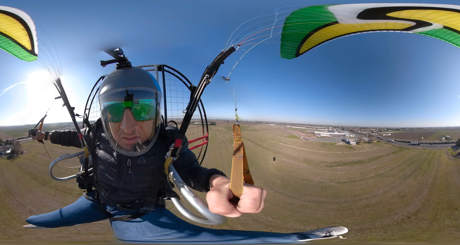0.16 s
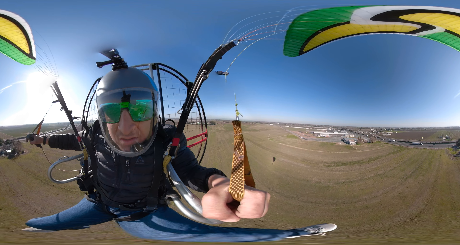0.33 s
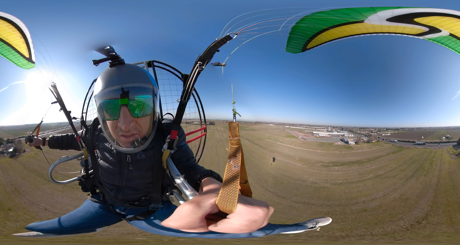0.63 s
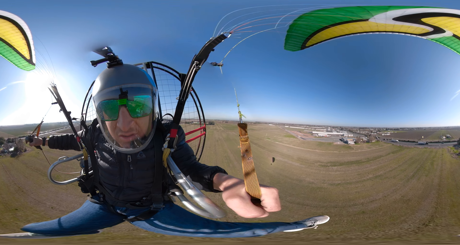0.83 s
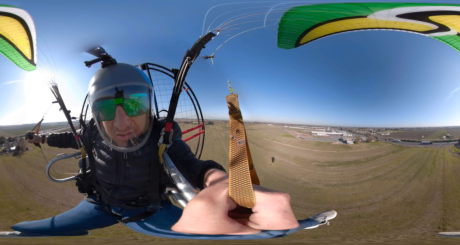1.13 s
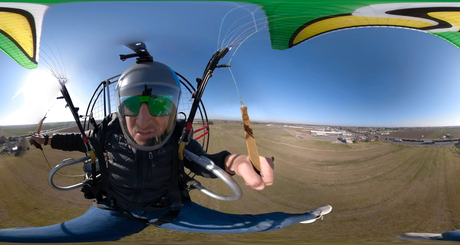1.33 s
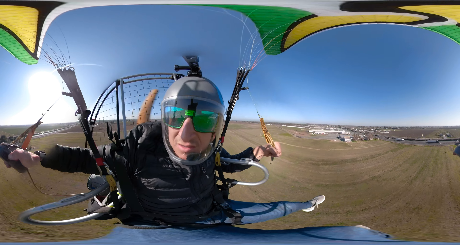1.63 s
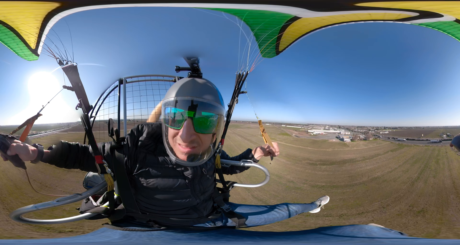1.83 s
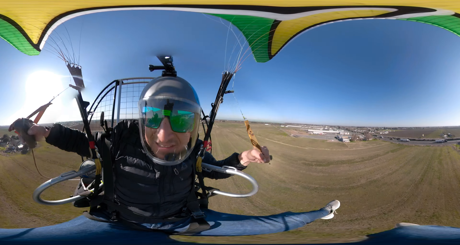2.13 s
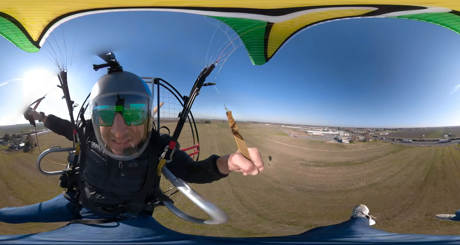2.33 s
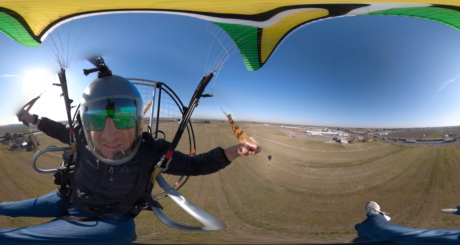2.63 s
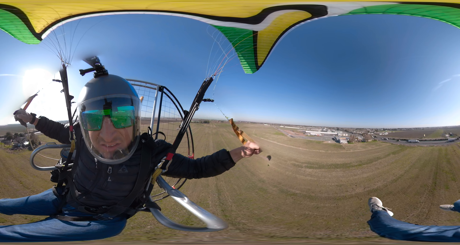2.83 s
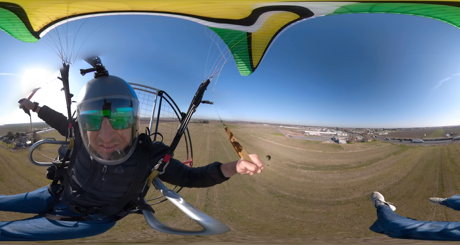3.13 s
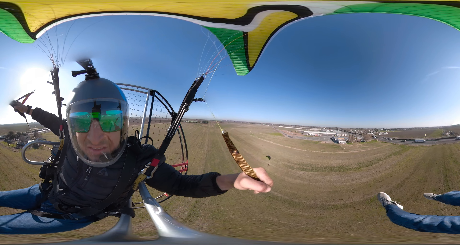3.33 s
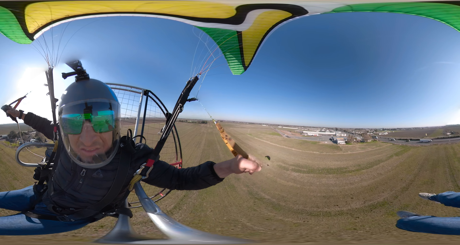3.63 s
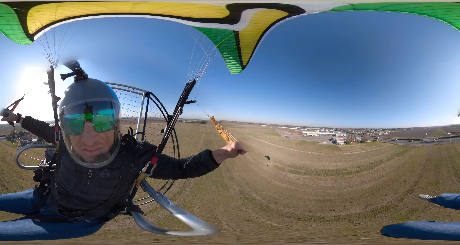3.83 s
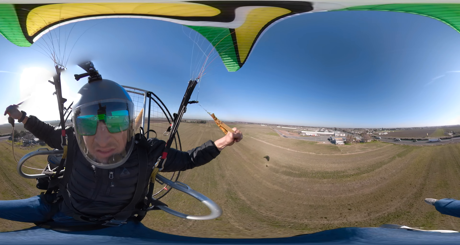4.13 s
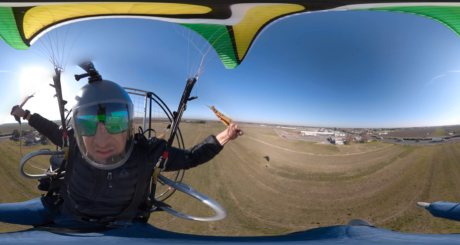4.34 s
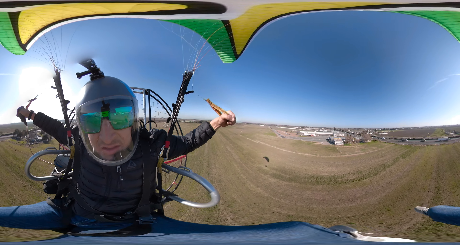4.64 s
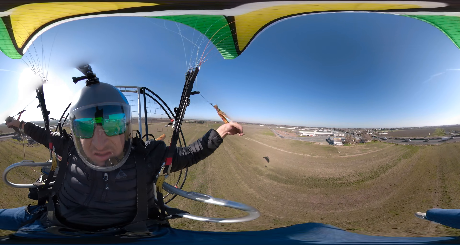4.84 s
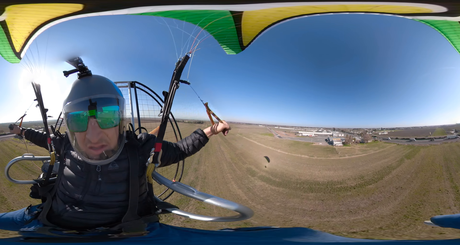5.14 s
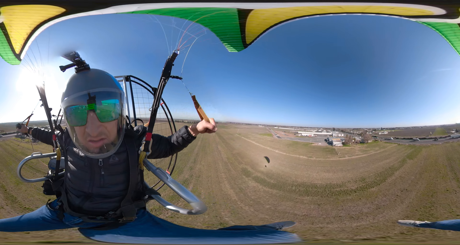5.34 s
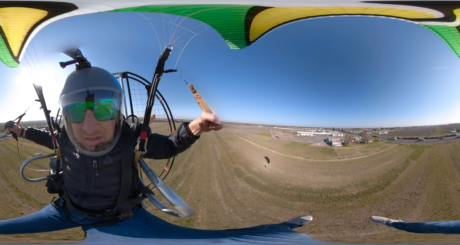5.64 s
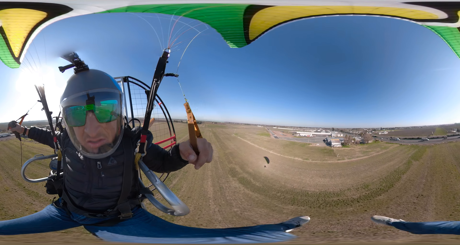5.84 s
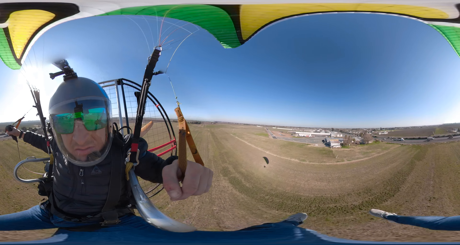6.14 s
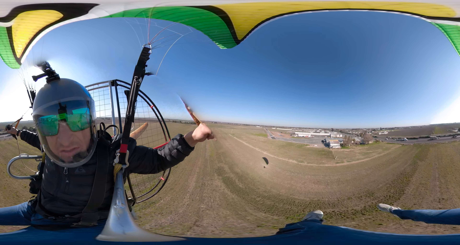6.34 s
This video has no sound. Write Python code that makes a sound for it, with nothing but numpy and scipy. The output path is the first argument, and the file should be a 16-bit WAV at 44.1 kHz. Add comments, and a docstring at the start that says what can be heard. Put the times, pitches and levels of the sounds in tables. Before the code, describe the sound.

A paramotor engine idles in flight, then shuts off and putters to a squeaky stop, leaving wind buffeting the microphone.

```python
"""A paramotor's single-cylinder engine idles and turns its propeller just behind the pilot, in open air.
Each crank turn puffs into the exhaust pipe's modes, firings bark, and the passing blades add a hum.
The engine is switched off, runs down in separate puffs and stops with a belt squeak and a jolt.
The freewheeling propeller keeps the clutch drum ringing and ticking by friction for a while,
and turbulent wind buffets the microphone."""
import sys
import numpy as np
from scipy import signal
from scipy.fft import rfft, irfft
from scipy.io import wavfile
from scipy.ndimage import uniform_filter1d

SR = 44100
rng = np.random.default_rng(int(sys.argv[2]) if len(sys.argv) > 2 else 0)


def waveform_to_disk(signal):
    """Save audio, clipped to [-1, 1], as 16-bit WAV at the path in sys.argv[1]."""
    frames = np.transpose(np.atleast_2d(signal))
    scaled = np.clip(frames, -1, 1) * 32767
    samples = np.round(scaled).astype(np.int16)
    wavfile.write(sys.argv[1], SR, samples)


N = 285768
TIME = np.arange(N) / SR

# turning rate of the crankshaft, one exhaust puff per turn: time_s, speed_hz
CRANK_RATE = [(0.0, 46.61), (0.3, 47.7), (0.6, 46.9), (0.9, 46.68), (1.2, 46.6), (1.8, 47.46), (2.1, 47.52),
              (2.35, 46.42), (2.55, 47.0), (2.7, 39.5), (2.85, 35.2), (3.0, 29.9), (3.2, 24.4), (3.6, 13.6),
              (3.8, 7.28)]
# spectrum of the engine's rasp: frequency_hz, density_db
RASP_SPECTRUM = [(180, -12), (300, -4.5), (471, -5.5), (504, -9), (619, -8), (691, -17.5), (803, -15.5),
                 (1230, -21), (1570, -19.5), (2240, -33), (3110, -35), (3470, -32.5), (4250, -43),
                 (5590, -31), (7870, -41.5), (10200, -60.5), (17300, -120)]
# spectrum of rubbing metal: frequency_hz, density_db
FRICTION_SPECTRUM = [(1500, -16.5), (2700, -5), (3500, -3.5), (4300, -12), (5000, 1.5), (5700, 1),
                     (6500, -9), (7600, 0.5), (8700, -21), (11000, -16), (15000, -35)]

IDLE_SPEED_HZ = 47
SWITCH_OFF_S, DYING_AWAY_S, STOP_S = 2.54, 0.3, 3.8


def engine():
    """Periodic excitation: each crank turn sends a puff down the exhaust; slow puffs are heard apart."""
    # strength and treble tilt of the puffs: time_s, level_db, tilt_db_per_octave
    puff_curve = [(0, -43, -15), (2.35, -22.5, -3), (2.58, -19.5, 0), (2.85, -18, 4.5), (3.08, -13.5, -4.5),
                  (3.3, -15, 1.5), (3.55, -16.5, -6), (3.8, -18.5, -5.5)]
    speed, turns = crankshaft()
    dying = np.clip((TIME - SWITCH_OFF_S) / DYING_AWAY_S, 0, 1)
    turn_starts = np.flatnonzero(np.diff(np.floor(turns)))
    puff_db, tilt_db = in_time(puff_curve)
    puffs = exhaust(TIME[turn_starts] - .0008, puff_db[turn_starts], tilt_db[turn_starts])
    running = hum(speed, turns, dying) + rasp(speed, turns, dying)
    return puffs + running + piston_knocks(turn_starts) + air_pumping(speed, turns)


def crankshaft():
    """Phase is the integral of frequency: speed in Hz and turns made, at every sample."""
    speed = in_time(CRANK_RATE)[0] * (TIME < STOP_S) + 1e-3
    return speed, .34 + np.cumsum(speed) / SR


def exhaust(times, level_db, tilt_db):
    """Modal superposition: puffs ring the pipe, and the lowest mode, in antiphase, rounds each one."""
    # modes of exhaust and frame: pitch_hz, level_db, t60_s
    pipe_modes = [(78, -1, 0.081), (127.3, -1, 0.12), (164.5, -6, 0.18), (240, -5.5, 0.13),
                  (405, -14, 0.085)]
    pivot_hz = pipe_modes[1][0]
    modes = []
    for hz, db, t60 in pipe_modes:
        mode_db = level_db + db + tilt_db * np.log2(hz / pivot_hz)
        modes.append(strike(times, mode_db, hz, t60, spread_db=1))
    return sum(modes[1:]) - modes[0]


def barks():
    """Impulse excitation: each firing slaps the air, rings the pipe, crackles and rattles metal."""
    # runs in which the engine barks every second turn: start_s, bark_count, level_db, rattle_change_db
    bark_runs = [(0.162, 1, -16, 3), (0.2050, 2, -12, -5), (0.3106, 2, -11, -11), (.4163, 6, -11.5, 2.5),
                 (0.6917, 2, -12.5, -4), (.7993, 2, -12.5, 1.5), (0.9072, 4, -12, -3), (1.0991, 2, -11, 2),
                 (1.1838, 1, -14, -5), (1.248, 4, -13, -2), (1.4200, 2, -20.5, -3), (1.5267, 2, -18.5, 12),
                 (1.632, 2, -16, -1), (1.7160, 3, -19.5, -5), (1.8640, 3, -14.5, 0), (2.0110, 1, -13, 5),
                 (2.053, 1, -20, -1), (2.096, 2, -14.5, -1), (2.203, 1, -17.5, 0), (2.2450, 1, -10.5, -3),
                 (2.3098, 1, -14, -1), (2.3519, 2, -12.5, 3), (2.437, 1, -17, -3), (2.4584, 1, -19.5, -1),
                 (2.5222, 1, -17, 3)]
    # pipe modes that a bark excites: pitch_hz, level_db, t60_s
    bark_modes = [(395, -2.5, 0.028), (540, -10.5, 0.018), (806, -9, 0.025), (1080, -17, 0.013),
                  (1500, -11.5, 0.017), (1840, -21.5, 0.019)]
    # modes of the rattling parts: pitch_hz, level_db, t60_s
    rattle_modes = [(3380, -40, 0.02), (3520, -27, 0.028), (3760, -33, 0.016), (5340, -30, 0.016),
                    (5800, -28, 0.024), (6920, -28, 0.022)]
    events = [(start + 2 * k / np.interp(start, *np.transpose(CRANK_RATE)), db, change)
              for start, count, db, change in bark_runs for k in range(round(count))]
    times, level_db, rattle_db = np.transpose(events)
    level_db = level_db - rng.standard_normal(len(times))
    pipe = -sum(strike(times + 0.000974, level_db + db, hz, t60, spread_db=1.2)
                for hz, db, t60 in bark_modes)
    edge = bursts(clicks_at(times + 0.00028, from_db(level_db - 0.5)), rise_s=0.0012, fall_s=0.0036)
    crackle = edge * butterworth(noise(RASP_SPECTRUM), 1, 900, "high")
    rattle = np.zeros(N)
    for hz, db, t60 in rattle_modes:
        delays = rng.uniform(0.0013, 0.0055, len(times))
        rattle += strike(times + delays, level_db + rattle_db + db, hz, t60, spread_db=3.5)
    puffs = exhaust(times - .001, level_db - 9.5, tilt_db=0)
    return puffs + pressure_slap(times + 0.00098, level_db + 2.5) + pipe + crackle + rattle


def pressure_slap(times, level_db):
    """A bark's pressure wave is a short compression followed by a longer, weaker rarefaction."""
    push_s, suction_s = .0015, 0.00325
    push, suction = (np.hanning(int(length * SR)) ** .3 for length in (push_s, suction_s))
    pulse = np.concatenate([push, -from_db(-3.5) * suction])
    slaps = np.convolve(clicks_at(times - push_s, from_db(level_db)), pulse)[:N]
    return butterworth(slaps + 1e-18, 2, 1660, "low")


def hum(speed, turns, dying):
    """Rotation makes harmonic series: the geared-down propeller hums out of step with the engine."""
    # harmonics of the blade-passing hum: order, level_db
    blade_orders = [(1, -8.5), (3, -7), (4, -6), (5, -10), (6, -9), (7, -6), (8, -15.5), (9, -16.5),
                    (10, -18.5), (14, -17)]
    # harmonics of the crank's turning rate: order, level_db
    engine_orders = [(1, -5), (5, -16.5), (6, -13.5), (7, -11.5), (9, -16), (10, -12.5), (12, -21),
                     (17, -22)]
    blade_passes_per_turn, throb_depth = .6405, 0.94
    blade_passes = blade_passes_per_turn * turns + .006 * drift(10)
    throb = 1 + throb_depth * np.cos(2 * np.pi * turns)
    blades = tones(blade_passes, blade_orders, waver_db=1.5) * throb
    blades *= (speed / IDLE_SPEED_HZ) ** 0.86
    drone = tones(turns, engine_orders, waver_db=0.5) * from_db(-9 * dying)
    return from_db(-18.5) * (blades + drone) * fade_below(speed, corner_hz=34)


def rasp(speed, turns, dying):
    """Amplitude modulation: noise throbs with each crank turn and weakens after the switch-off."""
    crank = 2 * np.pi * (turns - .12)
    throb_db = 5.14 * np.cos(crank) + 1.2 * np.cos(2 * crank)
    level_db = -29 - 7.5 * dying + throb_db + 2.8 * drift(100)
    return from_db(level_db) * (speed / IDLE_SPEED_HZ) ** 1.14 * noise(RASP_SPECTRUM)


def piston_knocks(turn_starts):
    """Impacts of the piston excite the cylinder's modes, most strongly as the engine runs down."""
    # strength of the knocks: time_s, level_db
    knock_curve = [(0, -73), (2.6, -51), (3.0, -32), (3.3, -26.5), (3.5, -31), (3.8, -33)]
    # modes of the cylinder: pitch_hz, level_db, t60_s
    cylinder_modes = [(1500, -12, 0.028), (1770, -8, .03), (1970, -6, 0.027), (2220, -13.5, .025)]
    times = TIME[turn_starts] + 0.00183
    knock_db = in_time(knock_curve)[0][turn_starts]
    return sum(strike(times + rng.uniform(0, .001, len(times)), knock_db + db, hz, t60)
               for hz, db, t60 in cylinder_modes)


def air_pumping(speed, turns):
    """Periodic displacement: with the engine off, the piston pumps air in tones that fall with speed."""
    # harmonics of the crank's turning rate: order, level_db
    pumping_orders = [(2, -22.5), (3, -26), (4, -25.5), (5, -29), (6, -26), (7, -27), (8, -33)]
    onset_s = 0.03
    coasting = np.clip((TIME - SWITCH_OFF_S) / onset_s, 0, 1) * fade_below(speed, corner_hz=30)
    uneven_turns = turns + .014 * drift(25)
    return coasting * tones(uneven_turns, pumping_orders, waver_db=1.5) * from_db(1.5 * drift(50))


def stall():
    """Recoil: the last compression throws the piston back, so the belt scuffs and the frame jolts."""
    # modes of the jolted frame: pitch_hz, level_db, t60_s
    jolt_modes = [(156, -8.5, 0.14), (193, -8.5, 0.056), (244, -8.5, 0.041), (438, -18.5, 0.052),
                  (527, -18, 0.042), (1490, -20.5, 0.06)]
    # resonances of the scuffed pulley: pitch_hz, bandwidth_hz, level_db
    pulley_modes = [(3770, 260, -31), (5750, 480, -26)]
    scuff_s, jolt_s = 3.8265, 3.8392
    scuff = bursts(clicks_at([scuff_s], [1]), rise_s=0.0027, fall_s=.004) * sing(pulley_modes)
    jolt = sum(strike([jolt_s], db, hz, t60) for hz, db, t60 in jolt_modes)
    return scuff + butterworth(jolt, 2, [90, 1100], "band")  # rubber mounts soften the blow


def belt_squeak():
    """Stick-slip friction: the belt squeaks as the engine stops, the fundamental ahead of its octave."""
    # slips of the belt, hardest first: start_s, length_s, fundamental_db, octave_db
    slips = [(3.826, 0.025, -24.5, -20.5), (3.865, 0.03, -37, -46.5), (3.98, 0.033, -56, -56)]
    pitch_hz, bend_hz, lift_hz = 3330, 382, 172
    attack_s, octave_attack_s, settle_s, release_s, tail_s = 0.0013, 0.014, 0.0032, 0.0043, 0.05
    hardest_db = slips[0][2]
    squeak = np.zeros(N)
    for start, length, fundamental_db, octave_db in slips:
        age = np.maximum(TIME - start, 0)
        since_release = np.maximum(age - length, 0)
        grip = np.exp(-np.minimum(since_release / release_s, 30))
        # a hard slip starts sharp, settles, and rises again as it lets go
        bend = from_db(fundamental_db - hardest_db) * np.exp(-age / settle_s)
        hz = pitch_hz + bend_hz * bend + lift_hz * (1 - grip)
        phase = 2 * np.pi * np.cumsum(hz * (1 + .008 * drift(250))) / SR
        phase += 0.051 * drift(810)  # fast jitter roughens the tone
        fundamental = from_db(fundamental_db) * np.minimum(age / attack_s, 1)
        octave = from_db(octave_db) * np.minimum(age / octave_attack_s, 1)
        partials = [fundamental, octave, from_db(-21) * fundamental, from_db(-33) * octave]
        tone = np.sqrt(2) * sum(size * np.sin(k * phase) for k, size in enumerate(partials, 1))
        friction = from_db(-20) * fundamental * noise(FRICTION_SPECTRUM)
        tail = from_db(-27) * np.exp(-since_release / tail_s)  # the pulley rings on
        squeak += np.maximum(grip, tail) * (tone + friction)
    return squeak * from_db(1.14 * drift(400))


def clutch():
    """Friction drives resonance: the shoes hiss on the drum, which rings near 7 kHz."""
    # strength of the drum's ringing: time_s, level_db
    drum_curve = [(0, -48), (.25, -49), (.45, -73), (2.6, -66.5), (3.75, -49.5), (4.12, -52), (4.26, -62),
                  (4.55, -64), (4.64, -57), (5.17, -59), (5.55, -77), (6.15, -102)]
    # strength of the rubbing hiss: time_s, level_db
    rub_curve = [(0, -51), (2.58, -48.5), (2.8, -56), (3.6, -53.5), (4.1, -61.5), (4.5, -62.5), (5.03, -54),
                 (5.2, -64), (5.5, -78), (6.15, -106)]
    # scrapes that make the drum flare: centre_s, half_width_s, level_db
    scrapes = [(3.594, 0.0046, -57), (3.703, 0.016, -44), (3.778, 0.0074, -46), (3.967, 0.0053, -44),
               (4.01, .009, -47.5), (4.643, 0.013, -54), (4.998, 0.016, -54), (5.1, 0.013, -46.5),
               (5.194, 0.021, -57)]
    # resonances of the drum: pitch_hz, bandwidth_hz, level_db
    drum_modes = [(7077, 52, 4), (7200, 28, 6.5), (7600, 270, -8)]
    rub_db, = in_time(rub_curve)
    ringing = from_db(in_time(drum_curve)[0] + 3.2 * drift(26))
    flares = sum(from_db(db) * swell(centre, half) for centre, half, db in scrapes)
    drum = (ringing + flares * from_db(2.5 * drift(250))) * rms_one(sing(drum_modes))
    hiss = from_db(rub_db + 2.3 * drift(25)) * noise(FRICTION_SPECTRUM)
    return drum + hiss + shoe_ticks(rub_db)


def shoe_ticks(rub_db):
    """Brief contacts make broadband ticks: the shoes catch now and then, and once a turn at low speed."""
    # distinct catches of the shoes: start_s, level_db
    catches = [(2.938, -32), (3.5572, -29), (3.8734, -29), (3.974, -35), (4.017, -31), (4.697, -31),
               (4.829, -39), (4.854, -29.5), (4.866, -37), (4.893, -33), (4.918, -36), (5.0508, -25),
               (5.1147, -27), (5.168, -25.5), (5.373, -35.5), (5.432, -49)]
    # spectrum of a tick: frequency_hz, density_db
    tick_spectrum = [(1200, -9), (2700, 1), (4200, -6.5), (5700, 4), (6800, 0), (8500, -16.5),
                     (12000, -21.5), (15000, -32)]
    slow_hz, lag_turns, faint_per_s = 24, .7, 10
    speed, turns = crankshaft()
    times, catch_db = np.transpose(catches)
    each_turn = (np.diff(np.floor(turns - lag_turns), prepend=0) > 0) * (speed < slow_hz)
    faint = rng.random(N) < faint_per_s / SR
    contacts = clicks_at(times, from_db(catch_db)) + each_turn * from_db(-38)
    contacts += faint * from_db(rub_db + 14)
    return from_db(-1.5) * bursts(contacts, rise_s=0.00034, fall_s=0.0016) * noise(tick_spectrum)


def wind():
    """Turbulence: lumpy pressure swings buffet the microphone; a smoother rush passes through the cage."""
    # strength of the airflow: time_s, buffet_db, rush_db
    airflow = [(0, -28, -35.5), (2.25, -25, -37.5), (2.6, -23, -33.5), (2.9, -31.5, -38),
               (3.4, -22.5, -39.5), (3.95, -24.5, -41), (4.28, -30, -39.5), (4.7, -24.5, -35.5),
               (5.9, -25, -35.5), (6.48, -27.5, -37)]
    # gusts and lulls: centre_s, half_width_s, change_db
    gusts = [(4.024, 0.036, -4), (4.673, 0.022, 5), (5.13, 0.032, 3), (5.228, 0.035, -5.5),
             (5.294, 0.018, 5.5), (5.5, .025, 3), (5.606, 0.024, -8), (5.726, .04, -4), (5.886, 0.054, 3),
             (6.317, 0.038, -4)]
    # spectrum of the buffeting: frequency_hz, density_db
    buffet_spectrum = [(15, -19.5), (28, -1), (50, 0), (90, 0.5), (130, -4), (170, -6.5), (225, -11.5),
                       (300, -16.5), (450, -28), (900, -73)]
    # spectrum of the rush: frequency_hz, density_db
    rush_spectrum = [(150, -21), (330, -1.5), (480, -1), (620, 0.5), (850, -2), (1200, -5.5), (1700, -10),
                     (2400, -18), (3300, -24), (4500, -32), (5800, -39), (7500, -49.5), (11000, -54),
                     (14000, -79.5)]
    # eddies that hit the microphone: start_s, level_db, pitch_hz
    eddies = [(3.959, -10, 70), (4.085, -11.5, 60), (4.543, -11.5, 69), (5.268, -5, 52.3), (5.884, -12, 90),
              (6.244, -8, 59)]
    buffet_db, rush_db = in_time(airflow)
    lumps = drift(31)
    gust_db = sum(db * swell(centre, half) for centre, half, db in gusts)
    buffet = from_db(buffet_db + gust_db + 1.46 * lumps + 0.5 * drift(7.8)) * noise(buffet_spectrum)
    rush = from_db(rush_db + 0.42 * lumps + 0.93 * drift(73)) * noise(rush_spectrum)
    thumps = -sum(strike([start], db, hz, t60=2.9 / hz) for start, db, hz in eddies)
    return buffet + rush + thumps


def frame_song():
    """Flow-excited resonance: the frame sings in the passing air."""
    # resonances of the frame: pitch_hz, bandwidth_hz, level_db
    frame_modes = [(226.4, 22, -43.5), (347, 4.8, -46), (917, 12, -50.5)]
    return sing(frame_modes) * from_db(np.interp(TIME, [3.2, 3.65, 5.1, 5.7], [-6, 2, 1.5, -12]))


def line_whistle():
    """Aeolian tone: air whistles thinly on a line, arching up in pitch and back."""
    start_s, length_s, pitch_hz, arch_hz = 6.08, 0.19, 5300, 690
    progress = (TIME - start_s) / length_s
    hz = pitch_hz + arch_hz * np.sin(np.pi * progress)
    blowing = uniform_filter1d(1.0 * (progress > 0) * (progress < 1), size=SR // 50)
    flutter = drift(446) * from_db(3.5 * drift(40))
    return from_db(-62) * blowing * flutter * np.sin(2 * np.pi * np.cumsum(hz) / SR)


def from_db(db):
    """Amplitude grows tenfold every 20 dB."""
    return 10 ** (np.asarray(db) / 20)


def rms_one(x):
    """Normalisation to rms 1."""
    return x / np.sqrt(np.mean(x ** 2) + 1e-20)


def in_time(rows):
    """Linear interpolation of each column of a curve at every sample."""
    times, *columns = np.transpose(rows)
    return [np.interp(TIME, times, column) for column in columns]


def swell(centre_s, half_width_s):
    """Gaussian envelope of height 1."""
    return np.exp(-((TIME - centre_s) / half_width_s) ** 2)


def fade_below(speed, corner_hz):
    """Power-law roll-off: the gain falls steeply below a corner speed."""
    return 1 / np.hypot(1, (corner_hz / speed) ** 8)


def butterworth(x, order, hz, kind):
    """Filtering with a maximally flat passband."""
    return signal.sosfilt(signal.butter(order, hz, kind, fs=SR, output="sos"), x)


def drift(rate):
    """Low-passed noise: a random wander of rms 1 with about `rate` swings a second."""
    hz = np.arange(N // 2 + 1) * SR / N
    return rms_one(irfft(rfft(rng.standard_normal(N)) / (1 + (hz / rate) ** 2), N))


def noise(spectrum):
    """Spectral shaping gives white noise a colour; rms 1."""
    hz = np.arange(1, N // 2 + 2) * SR / N
    points, db = np.transpose(spectrum)
    gain = from_db(np.interp(np.log(hz), np.log(points), db, left=-120, right=-120))
    return rms_one(irfft(rfft(rng.standard_normal(N)) * gain, N))


def ring(drive, hz, t60):
    """Damped oscillator: a unit click starts a decaying sine of height 1."""
    r, w = from_db(-60 / (t60 * SR)), 2 * np.pi * hz / SR
    return signal.lfilter([0, np.sin(w)], [1, -2 * r * np.cos(w), r * r], drive + 1e-18)


def strike(times, level_db, hz, t60, spread_db=0):
    """Free vibration of one mode after each blow, with an optional random spread in level."""
    sizes = from_db(level_db + spread_db * rng.standard_normal(len(times)))
    return ring(clicks_at(times, sizes), hz, t60)


def sing(resonances):
    """Forced vibration: noise sustains narrow resonances, each at its own rms level."""
    return sum(from_db(db) * rms_one(ring(rng.standard_normal(N), hz, np.log(1000) / np.pi / width))
               for hz, width, db in resonances)


def clicks_at(times, sizes):
    """Impulse train of single-sample clicks."""
    return np.bincount(np.clip(np.round(np.asarray(times) * SR).astype(int), 0, N - 1), sizes, N)


def bursts(clicks, rise_s, fall_s):
    """Exponential rise and decay turn each click into an envelope."""
    up, down = np.exp(-1 / (rise_s * SR)), np.exp(-1 / (fall_s * SR))
    return signal.lfilter([1 - up], np.convolve([1, -up], [1, -down]), clicks + 1e-18)


def tones(cycles, orders, waver_db):
    """Harmonics of a periodic motion, each wavering slowly in level."""
    return sum(from_db(db + waver_db * drift(4)) * np.sin(2 * np.pi * (round(k) * cycles + rng.random()))
               for k, db in orders)


def scene():
    """Free field: the sources add within arm's reach, with no walls to echo."""
    machine = engine() + barks() + stall() + belt_squeak() + clutch()
    return (machine + wind() + frame_song() + line_whistle())[None]


def record(dry):
    """Soft saturation rounds loud bass peaks; filters cut the deepest rumble and the top."""
    limit, cutoff_hz = .7, 15200
    bass = butterworth(dry, 1, 1200, "low")
    rounded = dry - bass + limit * np.tanh(bass / limit)
    rounded = butterworth(rounded, 2, 20, "high")
    return signal.sosfilt(signal.ellip(10, .1, 90, cutoff_hz, fs=SR, output="sos"), rounded)


dry = scene()
out = record(dry)
waveform_to_disk(out)
```